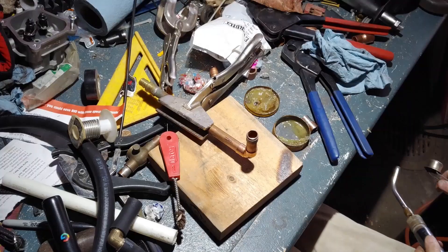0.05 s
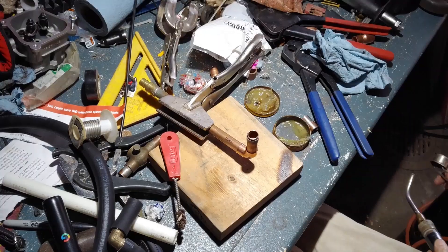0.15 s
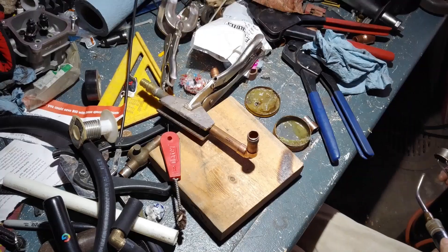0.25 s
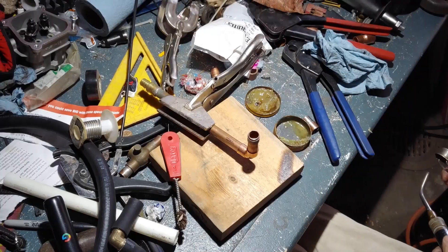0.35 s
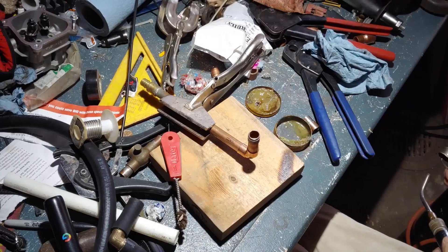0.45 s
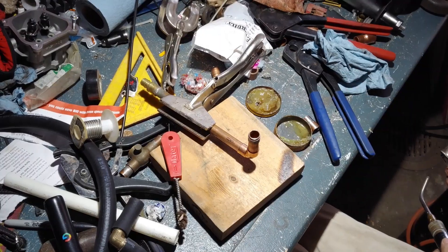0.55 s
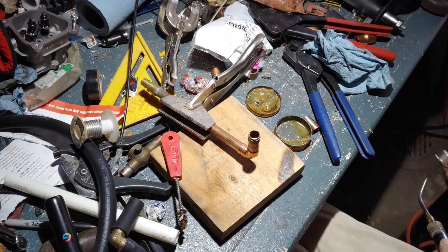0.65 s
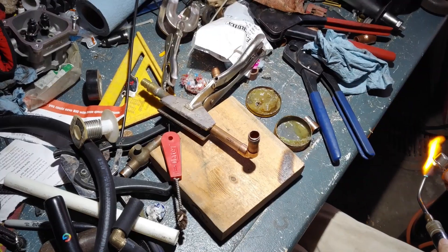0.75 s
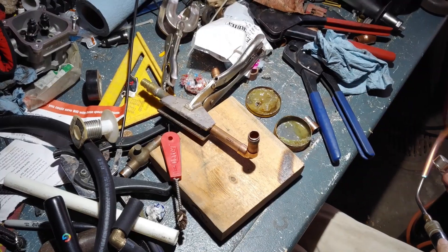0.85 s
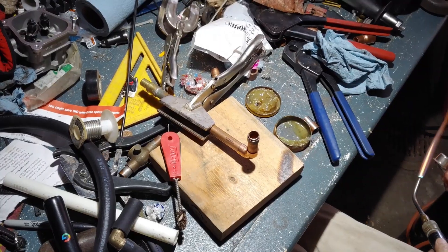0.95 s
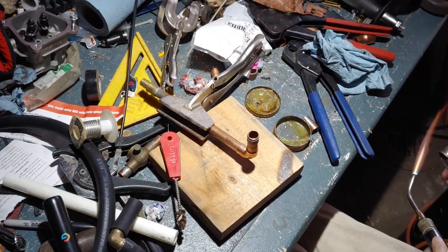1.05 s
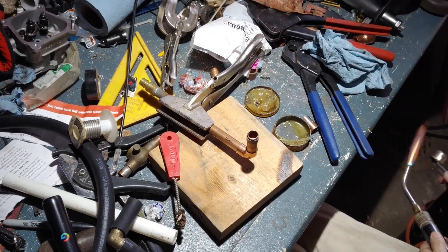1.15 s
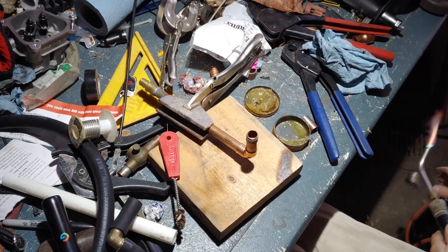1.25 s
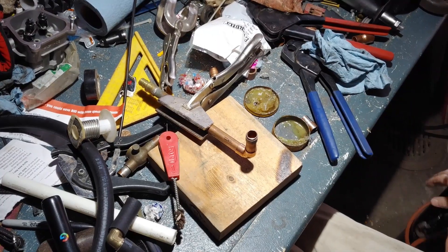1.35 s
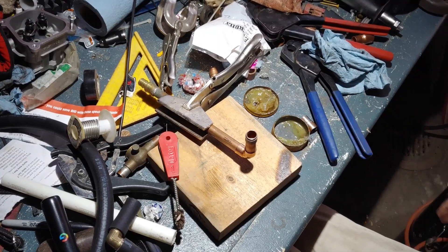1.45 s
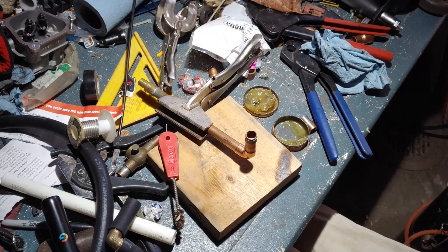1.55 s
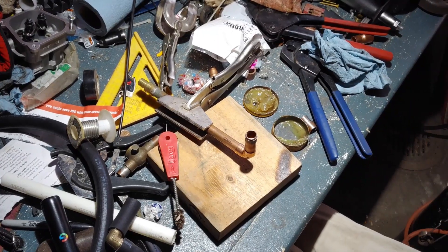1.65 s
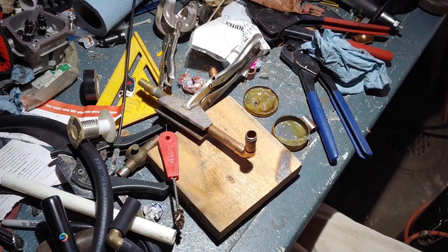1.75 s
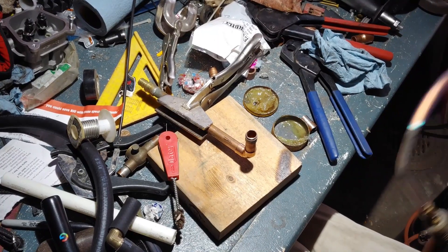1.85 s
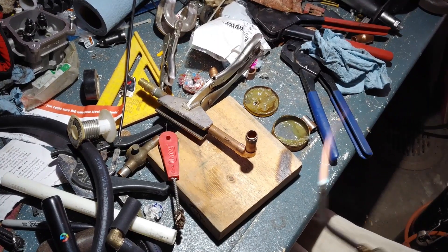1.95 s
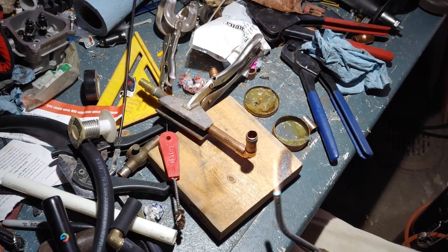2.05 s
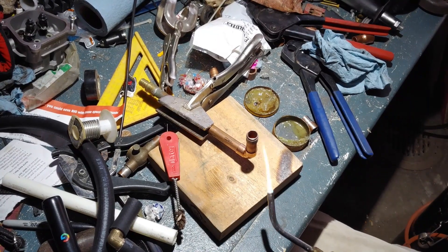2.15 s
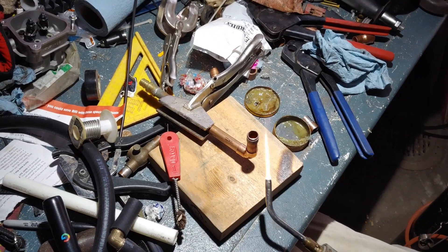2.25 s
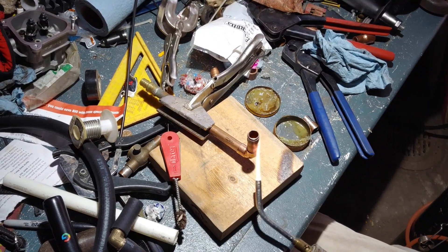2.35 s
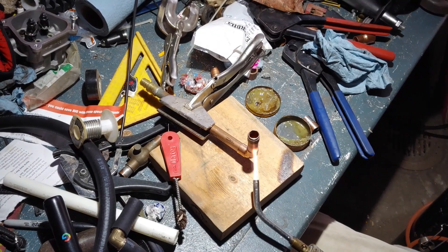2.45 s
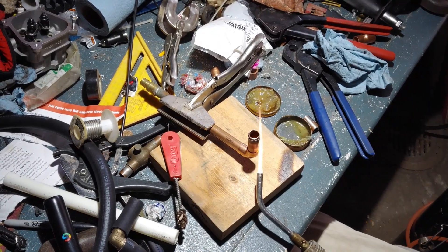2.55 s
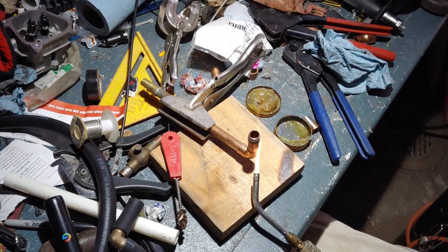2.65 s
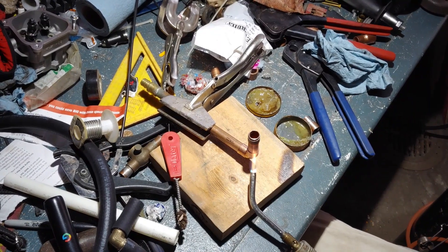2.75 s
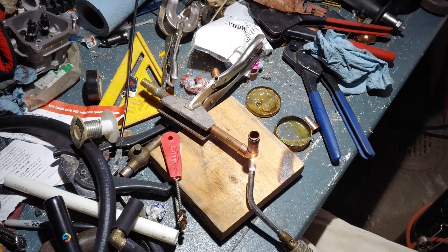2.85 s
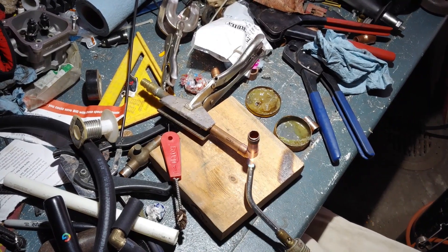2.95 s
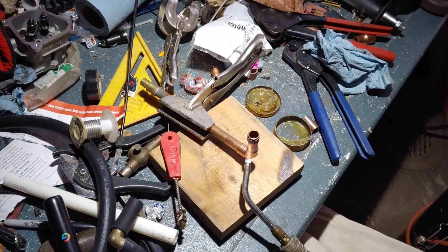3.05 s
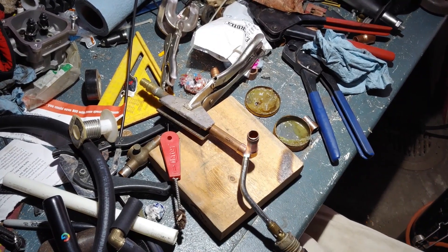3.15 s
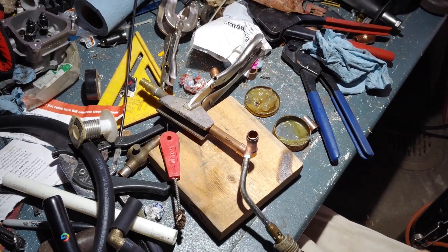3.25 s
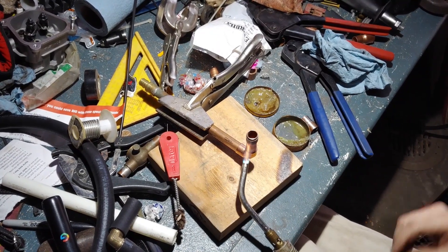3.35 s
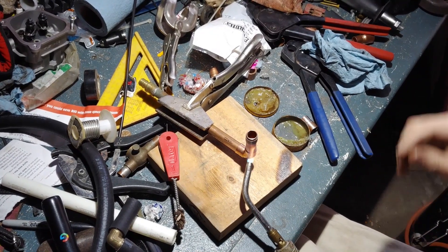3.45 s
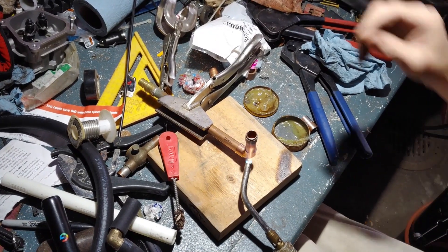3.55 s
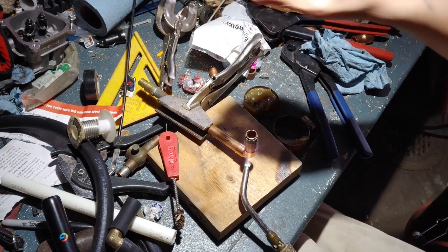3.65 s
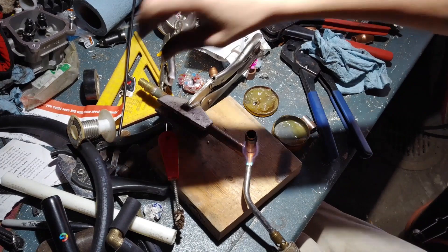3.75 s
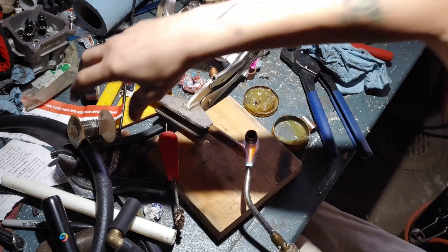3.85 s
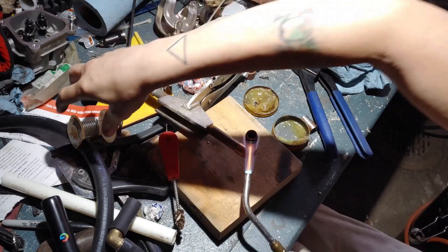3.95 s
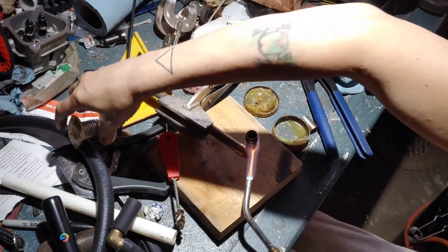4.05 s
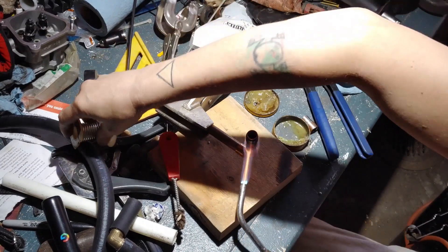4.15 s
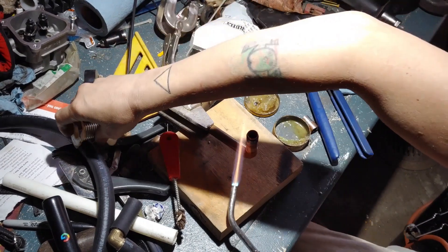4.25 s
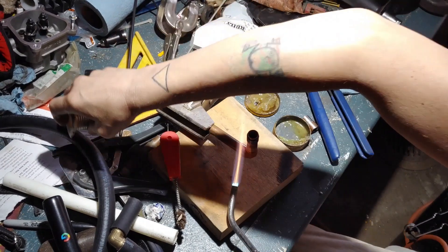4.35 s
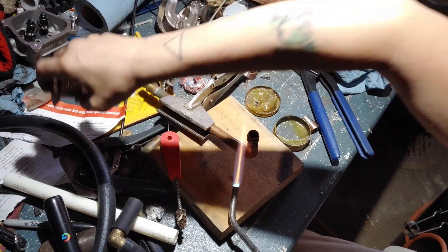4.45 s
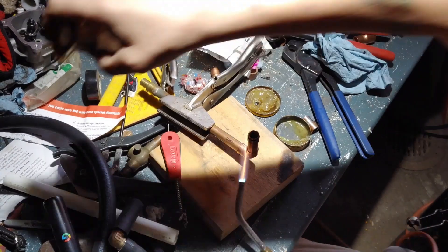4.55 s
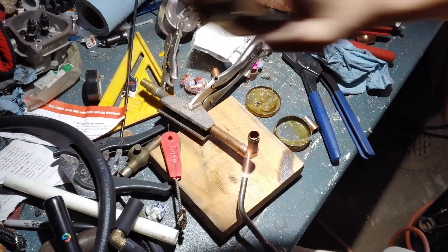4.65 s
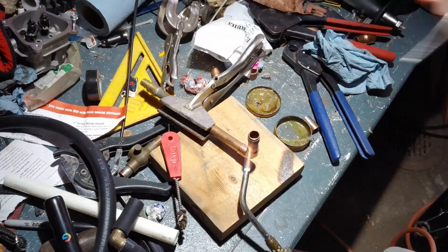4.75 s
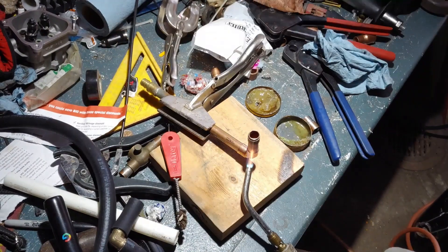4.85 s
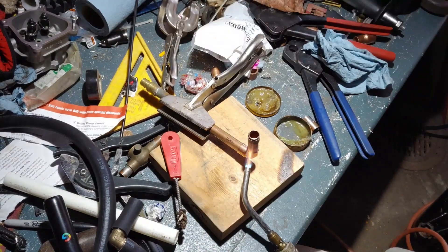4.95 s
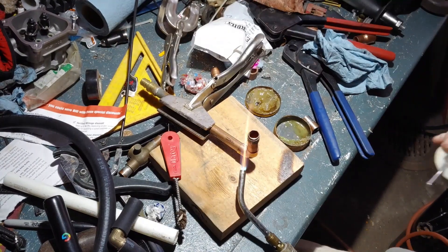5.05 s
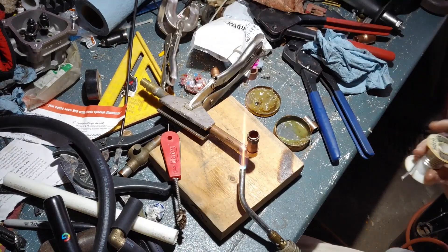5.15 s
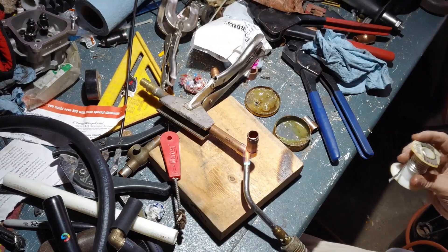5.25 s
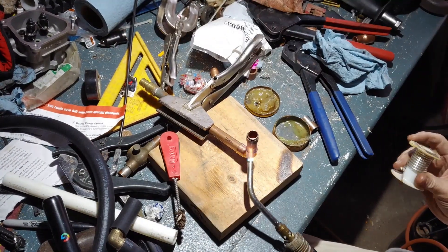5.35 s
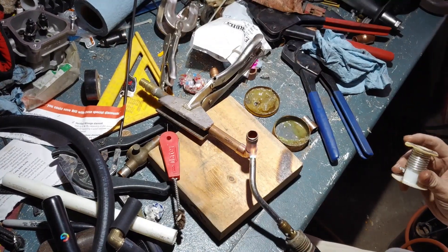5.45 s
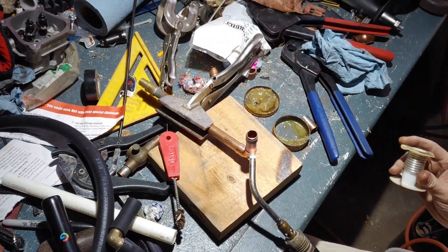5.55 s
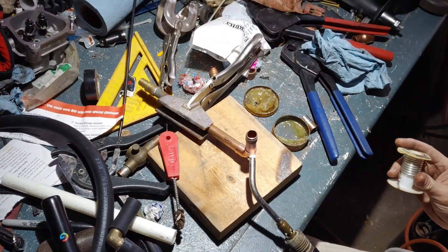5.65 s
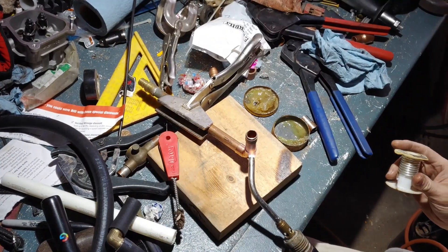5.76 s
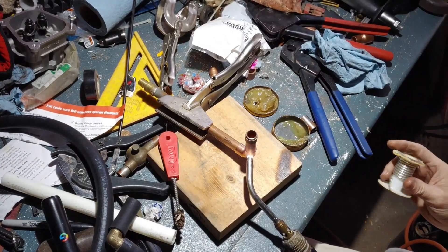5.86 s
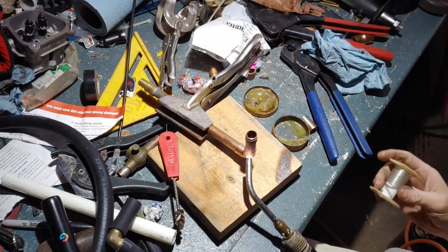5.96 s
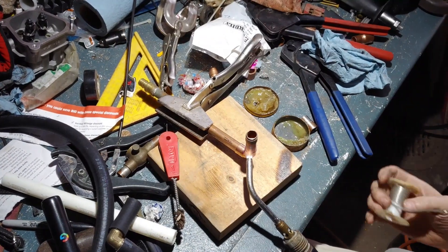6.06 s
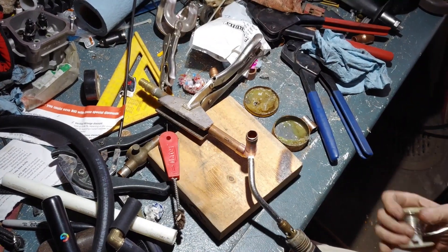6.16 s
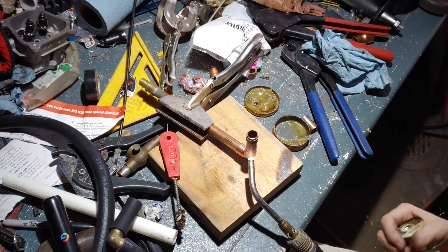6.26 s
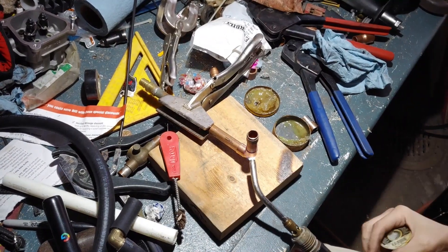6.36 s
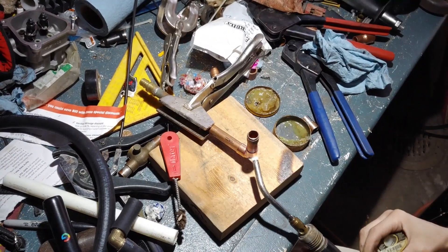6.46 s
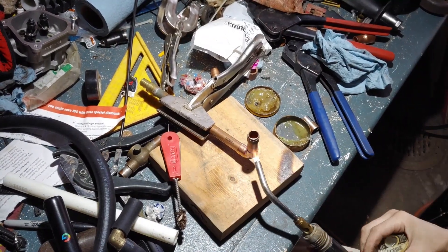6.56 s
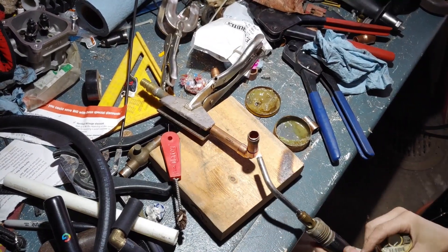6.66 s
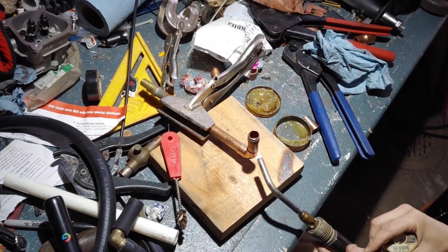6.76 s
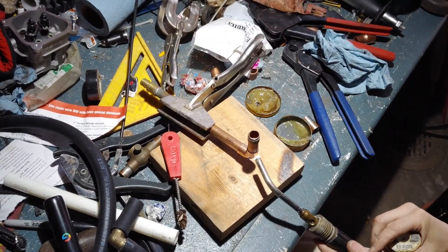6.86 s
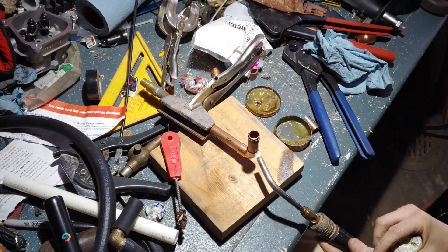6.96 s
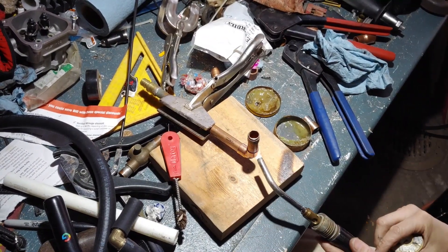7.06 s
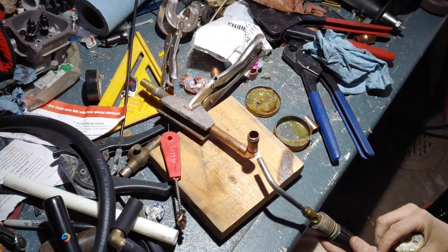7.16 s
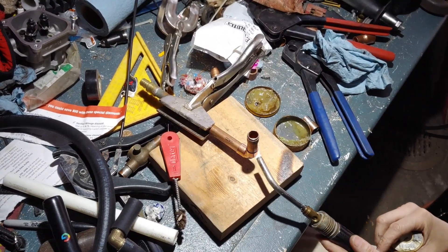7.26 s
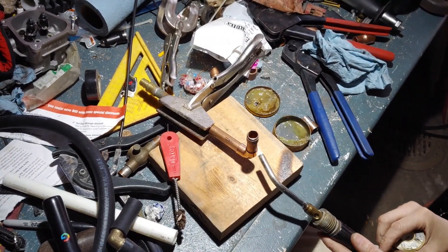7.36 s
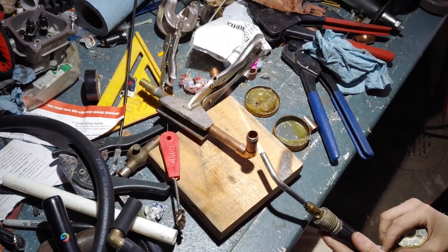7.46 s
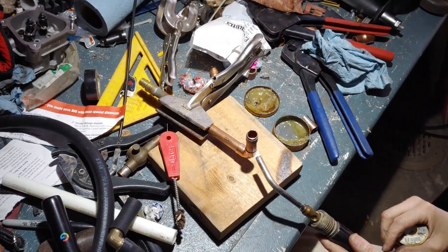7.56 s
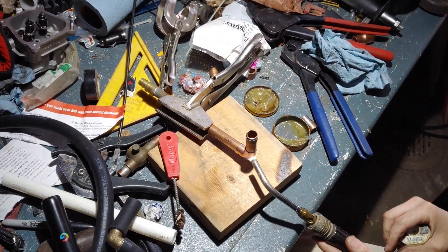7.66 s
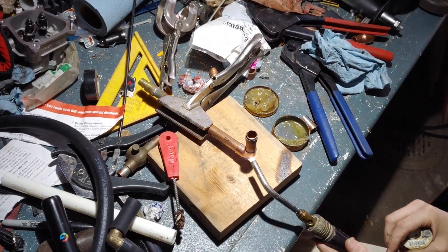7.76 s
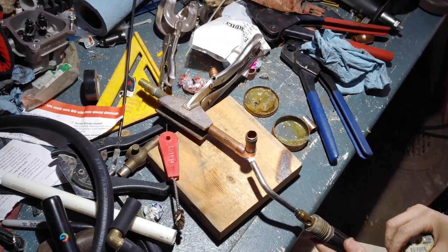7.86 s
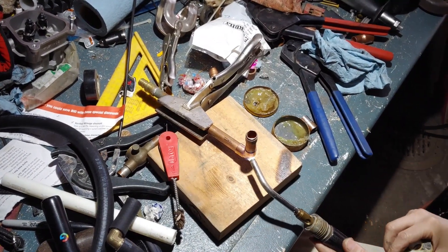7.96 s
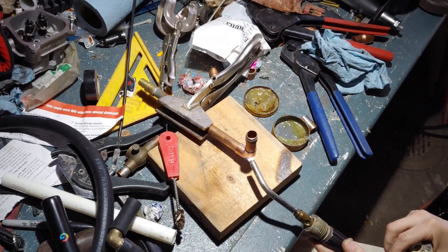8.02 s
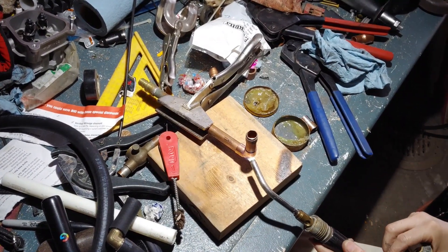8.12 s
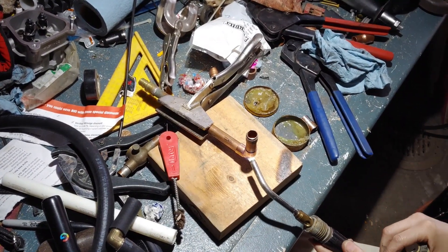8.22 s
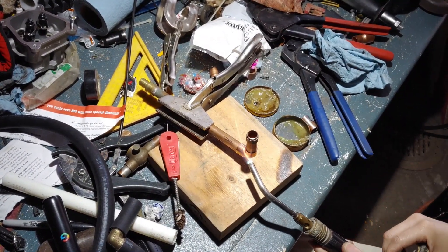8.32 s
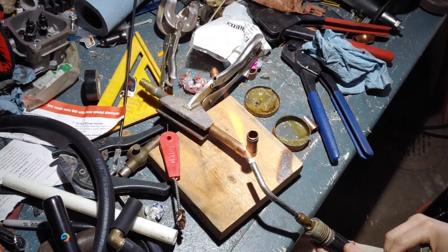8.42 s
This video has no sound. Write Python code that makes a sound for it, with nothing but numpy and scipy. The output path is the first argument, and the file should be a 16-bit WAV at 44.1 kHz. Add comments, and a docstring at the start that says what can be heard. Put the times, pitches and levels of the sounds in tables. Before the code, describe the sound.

A gas torch pops alight with a brief squeal, swings through the air, then roars and whistles steadily against copper pipe, with sharp mid-way pops.

```python
"""A soft singing of seeping gas over a faint workshop hum comes first, then light metal touches and hoots.
The valve opens and a gas hand torch lights with a pop and a squeal. Its flame hisses and roars in free air,
swings over the bench and settles on a copper elbow, where it roars louder, rings and pops again.
Shaped noise makes the gas, the flame and the room; sines make the squeal, the whistle, the hoots and the hum.
Pressure swings make the pops and struck modes the metal, all heard by a close pair of microphone ports."""
import sys
import numpy as np
from scipy import signal
from scipy.io import wavfile
from scipy.ndimage import uniform_filter1d

SR = 44100
rng = np.random.default_rng(int(sys.argv[2]) if len(sys.argv) > 2 else 0)


def dump(signal):
    """Clip the signal to [-1, 1] and save it as 16-bit WAV at the path in sys.argv[1]."""
    limited = np.clip(np.atleast_2d(signal).T, -1, 1)
    pcm = np.round(limited * 32767).astype(np.int16)
    wavfile.write(sys.argv[1], SR, pcm)


N = 374409
TIME = np.arange(N) / SR
# noise is coloured in short overlapping frames, a quarter frame apart
FRAME = 2048
HOP = FRAME // 4
FRAME_S = np.arange(int(np.ceil(4 * N / FRAME)) + 1) * FRAME / 4 / SR
BIN_HZ = np.maximum(np.arange(FRAME // 2 + 1) * SR / FRAME, 1)[:, None]


def undb(db):
    """Turn decibels into a gain."""
    return 10 ** (np.asarray(db) / 20)


def unit(x):
    """Scale to rms 1."""
    return x / np.sqrt(np.mean(x ** 2))


def curves(table, at=TIME):
    """Join the columns of a table by straight lines in time."""
    s, *columns = np.transpose(table)
    return [np.interp(at, s, column) for column in columns]


def over_hz(points):
    """Join points by straight lines on a log-frequency axis."""
    hz, value = np.transpose(points)
    return np.interp(np.log(BIN_HZ), np.log(hz), value)


def bell(hz, width_hz):
    """A smooth hump of height 1 on the frequency axis."""
    return np.exp(-.5 * ((BIN_HZ - hz) / width_hz) ** 2)


def resonances(modes, ratio=1):
    """Gain of a set of steep-sided resonances, all detuned by one ratio."""
    power = 0
    for hz, width_hz, db in modes:
        peak = undb(db) / (1 + ((BIN_HZ - hz * ratio) / width_hz) ** 2)
        power = power + peak ** 2
    return np.sqrt(power)


def walk(rate):
    """A random wander of rms near 1: levels held for 1 / rate s, then smoothed twice."""
    hold = max(int(SR / rate), 2)
    steps = np.repeat(rng.standard_normal(N // hold + 1), hold)
    smooth = uniform_filter1d(uniform_filter1d(steps, hold), hold)
    return unit(smooth[:N])


def rise(start_s, length_s, at=TIME):
    """A smooth step from 0 to 1."""
    return np.sin(np.pi / 2 * np.clip((at - start_s) / length_s, 0, 1)) ** 2


def held(start_s, end_s, fade_s, at=TIME):
    """Fade in around the start, hold at 1, fade out around the end."""
    return rise(start_s - fade_s / 2, fade_s, at) - rise(end_s - fade_s / 2, fade_s, at)


def fade(t60):
    """Die away exponentially from time zero, by 60 dB in t60 s."""
    return np.exp(-np.log(1000) * np.minimum(TIME / t60, 10))


def ring(modes):
    """Damped sines struck at time zero."""
    return sum(undb(db) * fade(t60) * np.sin(2 * np.pi * hz * TIME) for hz, db, t60 in modes)


def place(x, s, pan_db=0, lag_s=0):
    """Start a sound at s, leaning left and reaching the right port late."""
    left, right = np.broadcast_to(x, (2, N))
    left = undb(pan_db / 2) * np.interp(TIME - s, TIME, left, left=0)
    right = undb(-pan_db / 2) * np.interp(TIME - s - lag_s, TIME, right, left=0)
    return np.array([left, right])


# how far the left port leads the right: f/Hz, phase/radians
PORT_PHASE = [(20, 0), (500, 0.15), (1000, 0.45), (1300, 0.85), (1600, 0.5), (1850, 1.5), (2050, 0.3),
              (2330, 0.3), (2520, 3.1), (2800, 1.7), (3200, 0.8), (3500, 1.7), (4200, 1.9), (5000, 2.8),
              (7500, 3.2), (9000, 4.6), (12000, 5.3), (16000, 6.5)]
# how alike the two ports hear a sound: f/Hz, likeness/0-1
PORT_LIKENESS = [(40, 0.34), (250, 0.82), (550, 0.62), (800, 0.73), (1050, 0.55), (1350, 0.68), (1800, 0.4),
                 (2400, 0.27), (2900, 0.27), (3400, 0.57), (4200, 0.82), (5000, 0.6), (7000, 0.36),
                 (8000, 0.52), (11500, 0.22), (16000, 0.15)]
# how much louder the left port is than the right: f/Hz, level/dB
PORT_BALANCE = [(60, 2), (110, -2), (200, 2), (380, 2.5), (700, 2.5), (1290, 1.5), (1700, 2.5), (2050, 3.5),
                (2500, -2.5), (3000, 2), (4400, -1), (6000, 0.5), (8120, 5), (10300, 5), (12300, 12),
                (14500, 6.5)]
# fully aside, the right port hears it later, less alike and with its top shaded
ASIDE_LAG_S, ASIDE_BLUR = 0.0003, 0.45
SHADE_DB, SHADE_HZ, SHADE_WIDTH_HZ = 10, 13500, 2200


def turbulence(gain, aside=0):
    """Noise of a moving colour, rms 1 in the mean of two ports that hear it partly alike."""
    noise = rng.standard_normal((2, N))
    direct, scattered = signal.stft(noise, nperseg=FRAME, noverlap=FRAME - HOP)[2]
    alike = np.clip(over_hz(PORT_LIKENESS) * (1 - ASIDE_BLUR * aside), 0, .99)
    phase = over_hz(PORT_PHASE) + 2 * np.pi * BIN_HZ * ASIDE_LAG_S * aside
    shade_db = SHADE_DB * aside * bell(SHADE_HZ, SHADE_WIDTH_HZ)
    lean = undb((over_hz(PORT_BALANCE) + shade_db) / 2)
    left = direct * lean
    right = (alike * direct * np.exp(-1j * phase) + np.sqrt(1 - alike ** 2) * scattered) / lean
    # even out each frame, and make the colour hold for the sum of the ports
    gain = gain / np.sqrt(np.sum(gain ** 2, axis=0))
    gain = gain / np.sqrt(1 + alike * np.cos(phase)) / undb(shade_db / 2)
    ports = np.array([left, right]) * gain
    x = signal.istft(ports, nperseg=FRAME, noverlap=FRAME - HOP)[1][:, :N]
    return x / np.std(x.mean(axis=0))


# colour of the room noise: f/Hz, level/dB (per Hz, relative)
SHOP_NOISE = [(25, -26), (75, -10.5), (180, -9), (240, 1), (340, -4.5), (480, -6), (800, -13.5),
              (1300, -19.5), (3000, -24), (6000, -23.5), (12000, -22.5), (16000, -32)]
# steady tones of the hum: f/Hz, level/dB
HUM = [(75.4, -84.5), (150.7, -83), (242.2, -70.5), (425.3, -88), (931.3, -83)]


def workshop():
    """Low room noise under hum tones whose level and phase waver a little."""
    hum = 0
    for hz, db in HUM:
        level = np.sqrt(2) * undb(db + 0.57 * walk(7.7))
        hum = hum + level * np.sin(2 * np.pi * hz * TIME + 0.4 * walk(8.9))
    return hum + turbulence(undb(over_hz(SHOP_NOISE))) * undb(-63 + 0.15 * walk(1.3))


# the torch is lit off to the side and swung to the middle: t/s, how far aside/0-1
ASIDE = [(0.8, 0.45), (1.15, 0.5), (1.45, 0.7), (1.75, 0.78), (1.95, 0.58), (2.1, 0.22), (2.3, 0.04),
         (2.8, 0)]


def swung():
    """How far to the side the torch is in each frame, 0-1."""
    return np.clip(curves(ASIDE, FRAME_S)[0], 0, 1)


def eddies(patchy_db, span_s=0.069, span_hz=110):
    """Swirls in the gas make neighbouring frequencies swell and sink for a moment."""
    field = rng.standard_normal((len(BIN_HZ), len(FRAME_S)))
    # smear the random field over frequency, then over time
    for axis, steps in enumerate([span_hz * FRAME / SR, span_s / FRAME_S[1]]):
        hump = np.exp(-2 * (np.arange(-24, 25) / steps) ** 2)
        field = signal.fftconvolve(field, np.expand_dims(hump, 1 - axis), "same", axes=axis)
    return undb(patchy_db * unit(field))


# resonances of the cold burner under the seeping gas: f/Hz, width/Hz, level/dB (relative)
COLD_BURNER = [(2460, 90, -15), (4130, 100, -1.5), (5480, 120, -9.5), (6620, 64, -1), (6780, 40, 7),
               (7050, 200, -13), (7890, 80, -14), (8030, 64, -7)]
# loudness of the seeping gas: t/s, level/dB
SEEP_LEVEL = [(0, -84), (0.04, -62), (0.17, -61), (0.23, -66), (0.42, -68.5), (0.465, -60), (0.51, -68),
              (0.58, -65.5), (0.65, -60), (0.8, -61.5)]


def seep():
    """Before the flame, a trickle of gas sings softly in the resonances of the cold tube."""
    trickle = np.clip((0.81 - TIME) / .02, 0, 1)  # gone by 0.81 s
    colour = resonances(COLD_BURNER) * eddies(patchy_db=3.5, span_s=0.075, span_hz=450)
    song = turbulence(colour, swung())
    level = undb(curves(SEEP_LEVEL)[0] + 1.4 * walk(38.8))
    return place(song * trickle * level, 0, pan_db=2.5)


# light metal touches: t/s, level/dB, brightness/dB per octave
TINKS = [(0.6696, -45.5, -27), (1.067, -52, 5), (1.423, -38, 21), (4.7302, -20.5, 7)]
# the ringing modes of the small metal parts: f/Hz, level/dB (relative), t60/s
TINK_MODES = [(3400, -13, 0.044), (8800, -13, 0.016), (8730, 16.5, 0.052), (10400, -22, .008),
              (12500, -19, .012), (15100, -3, .01)]
BRIGHT_PIVOT_HZ = 8800  # brightness tilts the sound around this frequency


def tinks():
    """Small metal parts brush each other: a short scrape sets off a few high modes."""
    out = 0
    for s, db, bright_db in TINKS:
        tilted = []
        for hz, mode_db, t60 in TINK_MODES:
            tilted.append((hz, mode_db + bright_db * np.log2(hz / BRIGHT_PIVOT_HZ), t60))
        modes = ring(tilted)
        scrape = rng.standard_normal((2, N)) * fade(0.066)
        rung = signal.fftconvolve(scrape, modes[None, :SR // 4], axes=1)[:, :N]
        touch = rung / np.abs(rung).max() + 0.037 * scrape
        out = out + place(undb(db) * touch, s, pan_db=6.5)
    return out


# the handled metal slides as it touches: t/s, level/dB, swell/s, fade/s, brightness/dB per octave
BRUSHES = [(0.678, -61, 0.009, 0.024, -3), (4.736, -30.5, 0.038, 0.019, -3)]
# colour of the sliding metal: f/Hz, level/dB (per Hz, relative)
BRUSH_COLOUR = [(300, -44.5), (2500, -5), (7000, -8), (7900, -11), (8800, 4.5), (10000, -7), (11600, -4),
                (12800, -8), (15200, 2)]


def brushes():
    """Metal slides lightly over metal: a grainy, bright swish that swells and fades."""
    out = 0
    for s, db, swell_s, fade_s, bright_db in BRUSHES:
        colour = undb(over_hz(BRUSH_COLOUR) + bright_db * np.log2(BIN_HZ / BRIGHT_PIVOT_HZ))
        distance = np.maximum((s - TIME) / swell_s, (TIME - s) / fade_s)
        envelope = np.exp(-np.minimum(distance, 20))
        out = out + turbulence(colour) * envelope * undb(db + 1.5 * walk(440))
    return out


# brief soft hoots: t/s, f/Hz, level/dB, half length/s
HOOTS = [(0.73, 468, -57.5, 0.02), (1.306, 496, -59, 0.022), (1.538, 930, -56, 0.017),
         (1.638, 490, -53, 0.061)]


def hoot():
    """A few brief, soft, hollow tones: sines under smooth humps, their phase wavering a little."""
    waver = .5 * walk(24.2)
    out = 0
    for s, hz, db, half_s in HOOTS:
        envelope = np.exp(-np.square(((TIME - s) / half_s) ** 2))
        out = out + np.sqrt(2) * undb(db) * envelope * np.sin(2 * np.pi * hz * TIME + waver)
    return out


# the flame settles on the elbow, and its sound goes over from free air to pipe
CONTACT_S, SETTLE_S = 2.55, 0.7


def settling(pair, at=TIME):
    """Go over from the value in free air to the value on the pipe."""
    return pair[0] + (pair[1] - pair[0]) * rise(CONTACT_S, SETTLE_S, at)


# a surface close to the tip cuts a hollow into the sound (or fills it, below 0), helps or hinders
# the tube's ring, throws the roar back and shields the hiss:
# start t/s, end t/s, depth of the dip/dB, ring level/dB, roar level/dB, hiss level/dB
SURFACES = [(1.0, 1.187, 5, 8.5, -2, 1.5), (1.88, 2.067, 0, 8, 2.5, 1.5), (2.072, 2.333, 3, -9, 3.5, 1),
            (2.433, 2.8, 11.5, 3.5, -0.5, -2.5), (2.81, 3.03, 3.5, 6, 5.5, 3.5),
            (3.05, 3.75, -1.5, 1, -0.5, 2.5), (3.75, 4.154, -2, -0.5, 1, 0.5), (4.2, 4.697, 0, -4.5, 4, 1),
            (5.42, 5.985, -0.5, -0.5, -1, 0), (6.48, 8.7, 0.5, -1, 0.5, 0)]
SURFACE_FADE_S = 0.18


def nearby(at=TIME):
    """What close surfaces do to the flame over time, in dB: dip, ring, roar and hiss."""
    total = 0
    for start, end, *effects_db in SURFACES:
        total = total + np.outer(effects_db, held(start, end, SURFACE_FADE_S, at))
    return total


# the path of the torch tip: t/s, distance travelled/m
TRAVEL = [(0.8, 0), (1.7, .12), (2.3, .4), (3, .5), (8.49, .6)]


def reflections(strength, count=14):
    """Early echoes off the clutter comb the sound; the comb slides as the tip travels."""
    travel_m, = curves(TRAVEL, FRAME_S)
    total = 1
    for delay_s, heading in rng.uniform([.003, -1], [.018, 1], (count, 2)):
        moving_s = delay_s + heading * travel_m / 343  # speed of sound in m/s
        comb = np.cos((2 * np.pi * BIN_HZ * moving_s).astype(np.float32))
        total = total + strength / np.sqrt(count) * comb
    return np.maximum(np.abs(total), .2)


# the echo off the work just beside the tip: t/s, extra path/m, relative strength/0-1
ECHO = [(2.3, .09, 0), (2.47, .06, .6), (3, .072, .7), (3.16, .109, 1), (3.28, .1, 1), (3.62, .104, 1),
        (3.8, .071, .8), (3.97, .1, .7), (4.08, .097, .5), (4.22, .069, .6), (4.4, .059, .9),
        (4.68, .057, .9), (4.87, .092, .8), (5.02, .077, .6), (5.14, .082, .6), (5.27, .072, .8),
        (5.38, .084, .8), (5.47, .109, 1), (5.85, .091, 1), (6.35, .086, 1), (6.47, .072, .6),
        (6.65, .087, .8), (7, .072, .5), (7.17, .08, .7), (7.43, .064, .5), (7.64, .084, .6),
        (7.85, .071, .8), (8.49, .072, .8)]
ECHO_STRENGTH = 0.34  # of the direct sound, where the relative strength is 1


def close_echo():
    """One strong echo from beside the tip combs the sound; the comb sweeps as the hand moves."""
    detour_m, share = curves(ECHO, FRAME_S)
    echo = np.clip(share * ECHO_STRENGTH, 0, .9)
    return np.abs(1 + echo * np.exp(-2j * np.pi * BIN_HZ * detour_m / 343))


def glides(events, width_hz, fade_s):
    """Humps in the spectrum, in dB, that come, glide and go."""
    total = 0
    for start, end, first, last, db in events:
        hz = np.interp(FRAME_S, [start, end], [first, last])
        total = total + db * held(start, end, fade_s, FRAME_S) * bell(hz, width_hz)
    return total


# colour of the roar in free air: f/Hz, level/dB (per Hz, relative)
FREE_ROAR = [(250, -37.5), (600, -24), (850, -11.5), (1100, -11.5), (1350, -3), (1700, 2.5), (2100, 4.5),
             (2500, 6.5), (3050, 15), (3500, -25), (4500, -29), (7000, -48)]
# colour of the roar on the pipe: f/Hz, level/dB (per Hz, relative)
PIPE_ROAR = [(150, -33), (310, -15.5), (520, -6.5), (660, -5.5), (780, -1.5), (950, 4.5), (1120, 1),
             (1380, -3.5), (1950, 1.5), (2400, 1.5), (2850, -3.5), (3300, -1.5), (4400, -18), (7000, -55)]
# resonances of the fitting and the bench under the flame: f/Hz, width/Hz, level/dB
FITTING = [(283, 48, 11.5), (462, 70, -7.5), (640, 12, 3), (1108, 28, -7.5), (1344, 87, 6.5), (2400, 60, 1),
           (2880, 150, 0)]
# reflections off the bench and a passing arm lift or lower a gliding part of the roar:
# start t/s, end t/s, first f/Hz, last f/Hz, level/dB
LIFTS = [(0.8, 1.85, 1356, 1340, 6), (1.35, 1.58, 3080, 3030, 5.5), (1.8, 2.2, 750, 1130, 8),
         (1.85, 2.38, 1380, 1780, 11.5), (2.45, 3.05, 1280, 1350, 6), (2.45, 2.9, 960, 900, 1),
         (2.76, 3.08, 740, 770, 2.5), (3.9, 4.15, 1860, 1880, 7), (4.25, 4.72, 2420, 2420, 7.5),
         (4.3, 4.72, 2060, 1930, 3), (6.3, 8.7, 1475, 1550, 7.5), (6.6, 8.7, 1820, 1860, -1)]
# each pair: (in free air, on the pipe)
PIPE_SHARE = (0.44, 0.91)  # share of the roar coloured by the fitting, 0-1
ROAR_DB = (-6.5, -6.5)  # relative to the flame's loudness


def roar(bench):
    """Combustion noise, coloured more by the fitting once the flame rests on it."""
    on_pipe = np.clip(settling(PIPE_SHARE, FRAME_S), 0, 1)
    pipe_colour = over_hz(PIPE_ROAR) + sum(db * bell(hz, width) for hz, width, db in FITTING)
    colour_db = on_pipe * pipe_colour + (1 - on_pipe) * over_hz(FREE_ROAR)
    colour_db = colour_db + glides(LIFTS, width_hz=132, fade_s=0.21)
    noise = turbulence(bench * eddies(patchy_db=2.13) * undb(colour_db), swung())
    _, _, thrown_db, _ = nearby()
    return noise * undb(settling(ROAR_DB) + thrown_db + 1.1 * walk(35))


# resonances of the hot burner tube and the fitting, as tuned on the pipe:
# f/Hz, width/Hz, level/dB (relative)
BURNER = [(3175, 72, -5.5), (3480, 40, -9.5), (3460, 50, -16.5), (3660, 36, -3), (3870, 81, -4),
          (4063, 115, -2), (4350, 70, -8), (4336, 71, -1)]
# the strongest tube mode whistles, its pitch following the heat: t/s, f/Hz
WHISTLE_PITCH = [(0.9, 4220), (2.7, 4170), (3.2, 4290), (4.25, 4340), (5.3, 4292), (5.85, 4298),
                 (6.4, 4322), (7.5, 4345), (8.49, 4340)]
# the whistle catches hard for a moment: start t/s, end t/s, level/dB
WHISTLE_SURGES = [(4.335, 4.362, 9.4), (5.28, 5.346, 4)]
SURGE_FADE_S = 0.012
WHISTLE_WAVER, WHISTLE_JITTER = 0.0025, 0.003  # slow and fast wander, as shares of the pitch
WHISTLE_BURST_DB = 6
# each pair: (in free air, on the pipe); levels are relative to the flame's loudness
TUBE_DB, WHISTLE_DB = (-10, -3), (-12.5, -8)
TUBE_PITCH = (0.975, 1)  # the burner's pitch ratio rises with heat


def tube(bench):
    """The burner tube rings in fits; its strongest mode whistles in short uneven bursts."""
    pitch = settling(TUBE_PITCH, FRAME_S)
    colour = bench * close_echo() * eddies(patchy_db=2.5) * resonances(BURNER, pitch)
    _, ring_db, _, _ = nearby()
    body = turbulence(colour, swung()) * undb(settling(TUBE_DB) + ring_db + 0.65 * walk(45))
    hz = curves(WHISTLE_PITCH)[0] * (1 + WHISTLE_WAVER * walk(25) + WHISTLE_JITTER * walk(300))
    surge_db = sum(db * held(start, end, SURGE_FADE_S) for start, end, db in WHISTLE_SURGES)
    burst_db = WHISTLE_BURST_DB * np.tanh(walk(40))
    tone = np.sqrt(2) * np.sin(2 * np.pi * np.cumsum(hz) / SR)
    whistle = tone * undb(settling(WHISTLE_DB) + surge_db + burst_db)
    return body + place(whistle, 0, lag_s=.00007)


# colour of the jet's hiss: f/Hz, level/dB (per Hz, relative)
HISS = [(2000, -29), (3500, 3), (4600, 1.5), (5200, 1), (5850, 0.5), (6900, 0.5), (7750, -6.5),
        (9300, -2.5), (10300, -4.5), (11600, -5), (12800, -10), (14500, -9.5), (16000, -8.5)]
# reflections off the fitting and the arm lift or hollow thin bands of the hiss:
# start t/s, end t/s, first f/Hz, last f/Hz, level/dB
HISS_LIFTS = [(1.0, 1.18, 4800, 4700, 10), (2.55, 3.0, 9150, 9400, 5.5), (4.3, 4.74, 3800, 3650, -9),
              (4.38, 4.92, 11500, 11900, 3), (5.75, 6.42, 11300, 11600, 5)]
# the top of the hiss dulls briefly while the torch swings: start t/s, end t/s, level/dB
DULL_SPELLS = [(1.094, 1.84, -5), (2.077, 2.174, -10), (2.547, 2.9, -0.5)]
DULL_HZ, DULL_WIDTH_HZ, DULL_FADE_S = 13700, 3100, 0.059
# the valve opens with a spurt of gas
VALVE_S, VALVE_OPEN_S, SPURT_DB, SPURT_DECAY_S = 0.801, 0.002, 2, 0.25
HISS_DB = (-3, -4)  # relative to the flame's loudness: (in free air, on the pipe)


def hiss(bench):
    """The jet hisses from the moment the valve opens, a little harder at first."""
    dull_db = sum(db * held(start, end, DULL_FADE_S, FRAME_S) for start, end, db in DULL_SPELLS)
    colour_db = over_hz(HISS) + dull_db * bell(DULL_HZ, DULL_WIDTH_HZ)
    colour_db = colour_db + glides(HISS_LIFTS, width_hz=230, fade_s=0.2)
    colour = undb(colour_db) * eddies(patchy_db=2.0, span_s=0.027, span_hz=210)
    noise = turbulence(bench * close_echo() * colour, swung())
    spurt_db = SPURT_DB * np.exp(-np.maximum(TIME - VALVE_S, 0) / SPURT_DECAY_S)
    _, _, _, shield_db = nearby()
    level = undb(settling(HISS_DB) + spurt_db + shield_db + 0.53 * walk(32))
    return noise * level * rise(VALVE_S, VALVE_OPEN_S)


# loudness of the flame as the torch is swung about and then held on the pipe: t/s, level/dB
FLAME = [(0.97, -41), (1.57, -39.5), (1.68, -41), (1.95, -34), (2.04, -36), (2.52, -37), (2.7, -36),
         (2.85, -37), (3.05, -32), (3.76, -30), (4.26, -31.5), (4.3, -31), (4.61, -31.5), (4.7, -29.5),
         (7.4, -31.5), (7.59, -30), (7.67, -32.5), (7.82, -30), (8.49, -30.5)]
DIP_HZ, DIP_WIDTH_HZ = 3130, 660
IGNITION_S, CATCH_S = 0.765, 0.1  # the flame takes hold
LEAN_DB = (0.5, -1.16)  # left minus right: (in free air, on the pipe)


def flame():
    """Roar, tube and hiss share one loudness, one flutter and the reflections of the bench."""
    level_db, = curves(FLAME)
    dip_db, _, _, _ = nearby(FRAME_S)
    hollow_shape = np.exp(-np.square(((BIN_HZ - DIP_HZ) / DIP_WIDTH_HZ) ** 2))
    bench = undb(-dip_db * hollow_shape) * reflections(strength=0.53)
    burning = (roar(bench) + tube(bench)) * rise(IGNITION_S, CATCH_S)
    pan_db = settling(LEAN_DB)
    loudness = undb(level_db + 0.51 * walk(22) + np.array([pan_db, -pan_db]) / 2)
    return (burning + hiss(bench)) * loudness


# the squeal flares up again while the flame is in free air: start t/s, end t/s, level/dB
FLARES = [(0.866, 0.968, -41.5), (1.2, 1.596, -51.5), (1.783, 2.35, -43)]
FLARE_FADE_S, FLARE_FLICKER_DB = 0.13, 3.5
# lighting drives one mode of the tube: it swells, then dies away
SQUEAL_S, SQUEAL_ATTACK_S, SQUEAL_DB, SQUEAL_FALL_DB_PER_S = 0.826, 0.038, -33.5, 190
# it starts sharp, sags, and drifts on slowly downward
SQUEAL_HZ, SQUEAL_SHARP_HZ, SQUEAL_DRIFT_HZ_PER_S = 2642, 72, 22
SQUEAL_SAG_AT_S, SQUEAL_SAG_S, SQUEAL_FLUTTER_DB = 0.873, 0.032, 2
SQUEAL_RASP = (5370, 170, 0)  # a rough band about an octave up: f/Hz, width/Hz, level/dB


def squeal():
    """A tube mode sings as the flame catches, sags in pitch and comes back as an unsteady whistle."""
    since_s = TIME - SQUEAL_S
    sharp_hz = SQUEAL_SHARP_HZ * (1 - rise(SQUEAL_SAG_AT_S, SQUEAL_SAG_S))
    hz = SQUEAL_HZ + sharp_hz - SQUEAL_DRIFT_HZ_PER_S * np.maximum(since_s, 0)
    phase = 2 * np.pi * np.cumsum(hz * (1 + 0.0061 * walk(250))) / SR
    fall_db = SQUEAL_FALL_DB_PER_S * np.clip(since_s - SQUEAL_ATTACK_S, 0, 1)
    envelope = rise(SQUEAL_S, SQUEAL_ATTACK_S) * undb(SQUEAL_DB - fall_db)
    flutter = unit(undb(SQUEAL_FLUTTER_DB * walk(200)))
    rasp = turbulence(resonances([SQUEAL_RASP]))
    overtone = rasp * rise(SQUEAL_S + SQUEAL_ATTACK_S / 2, SQUEAL_ATTACK_S)
    clean = envelope * (flutter * np.sqrt(2) * np.sin(phase) + undb(-14) * overtone)
    # the flares are narrow noise that follows the same pitch
    pitch = np.interp(FRAME_S, TIME, hz) / SQUEAL_HZ
    narrow = turbulence(resonances([(SQUEAL_HZ, 55, 0)], pitch))
    flares = sum(undb(db) * held(start, end, FLARE_FADE_S) for start, end, db in FLARES)
    unsteady = flares * undb(FLARE_FLICKER_DB * walk(60)) * narrow
    return place(clean, 0, pan_db=15.0, lag_s=.00008) + unsteady


# pockets of gas go off: t/s, level/dB, half width of the pressure swing/s, bounce share/0-1,
# time between bounces/s, boom level/dB, room tail level/dB, tail t60/s, crack level/dB, low cut f/Hz
# (boom, tail and crack levels are relative to the pop's own level)
POPS = [(0.8338, -4.5, 0.00064, 0.3, 0.0028, -7, -14.5, 0.23, -19.5, 95),
        (4.3879, -17.5, 0.00051, 0.5, 0.004, -8.5, -10.5, 0.19, -7, 95),
        (4.398, -21, 0.0006, 0.5, 0.0039, -14, -15, 0.2, -22, 95),
        (5.0174, -26.5, 0.00064, 0.84, 0.00266, -8, -10, 0.11, -25, 150)]
# the bench and the air around it answer each pop: f/Hz, level/dB (relative), t60/s
BOOM = [(93, -27.5, 0.33), (178, -19, 0.22), (269, -7, 0.16), (318, -16, 0.17), (383, -16, 0.19),
        (557, -39.5, 0.13), (589, -15.5, 0.15), (707, -17.5, 0.14), (782, -22, 0.24), (1360, -20, 0.054),
        (1850, -18, 0.08)]
# colour of the room tail: f/Hz, level/dB (per Hz, relative)
POP_TAIL = [(60, -16), (150, -18), (230, 0), (330, -1.5), (540, -5.5), (700, -15), (1050, -20),
            (1400, -20.5), (2400, -28.5), (4000, -60), (8000, -68)]
CRACK = (1100, 780, 0)  # the sharp edge of a pop: f/Hz, width/Hz, level/dB
# the flame front builds briefly, and the burning pocket sputters
POP_BUILD_S, POP_RAGGED_DB = 0.003, 2.5


def pops():
    """Each pop is a bouncing pressure swing (suck, push, suck) with a crack, a boom and a dull room tail."""
    out = 0
    boom = ring(BOOM) * (1 - fade(0.004))
    crack = turbulence(resonances([CRACK])) * fade(0.034)
    for s, db, width_s, bounce, gap_s, boom_db, tail_db, t60, crack_db, cut_hz in POPS:
        swing = 0
        for k in range(4):  # the swing itself, then three bounces off things close by
            u = (TIME - s - k * gap_s) / width_s
            swing = swing + min(bounce, 1) ** k * (1 - u ** 2) * np.exp(-np.minimum(u ** 2, 100) / 2)
        tail = turbulence(undb(over_hz(POP_TAIL))) * undb(tail_db + POP_RAGGED_DB * walk(300))
        # the flame front builds for a few ms before the swing, and the room dies away after it
        build = np.exp(-np.abs(TIME - s) / POP_BUILD_S)
        tail = tail * np.where(TIME < s, build, np.interp(TIME - s, TIME, fade(t60)))
        answer = place(undb(boom_db) * boom, s + 0.00256, pan_db=3.0, lag_s=.0001)
        edge = place(undb(crack_db) * crack, s - width_s)
        pop = place(swing, 0, pan_db=1.5, lag_s=0.00038) + answer + tail + edge
        low_cut = signal.butter(2, cut_hz, "high", fs=SR, output="sos")
        out = out + undb(db) * signal.sosfilt(low_cut, pop)
    return out


def scene():
    """Everything on and around the bench."""
    before = workshop() + seep() + tinks() + brushes() + hoot()
    return before + flame() + squeal() + pops()


TOP_HZ = 15850


def record(dry):
    """The recorder cuts the top with a steep low-pass filter."""
    top_cut = signal.ellip(12, .1, 80, TOP_HZ, fs=SR, output="sos")
    return signal.sosfilt(top_cut, dry)


dry = scene()
out = record(dry)
dump(out)
```